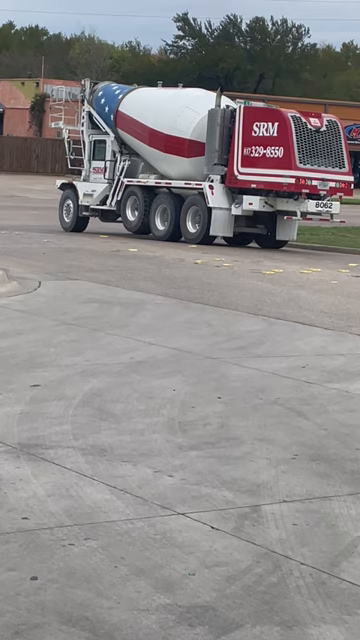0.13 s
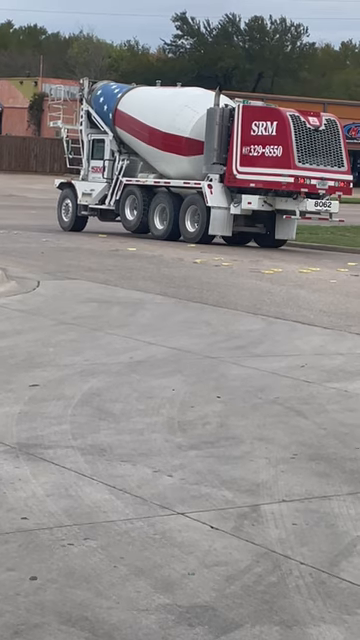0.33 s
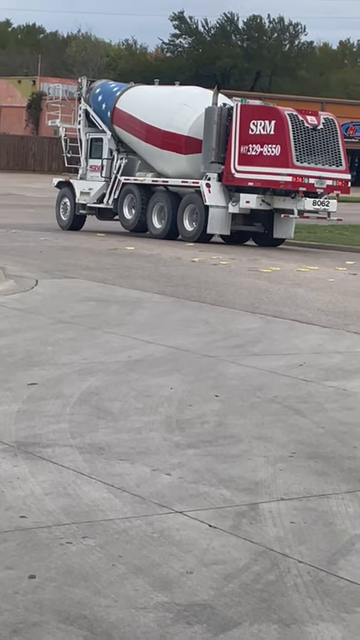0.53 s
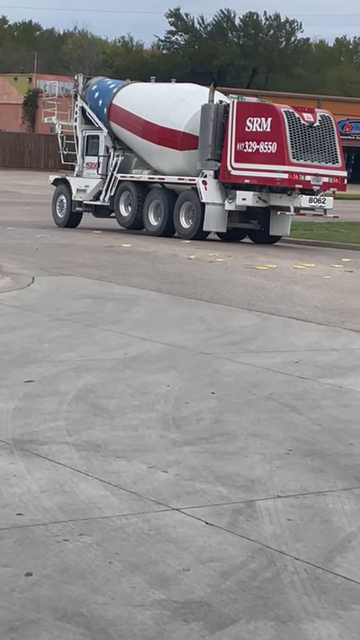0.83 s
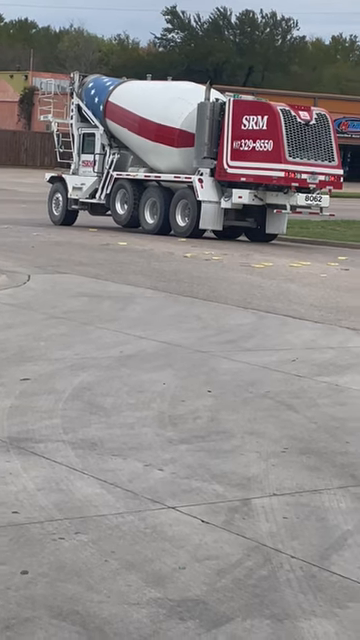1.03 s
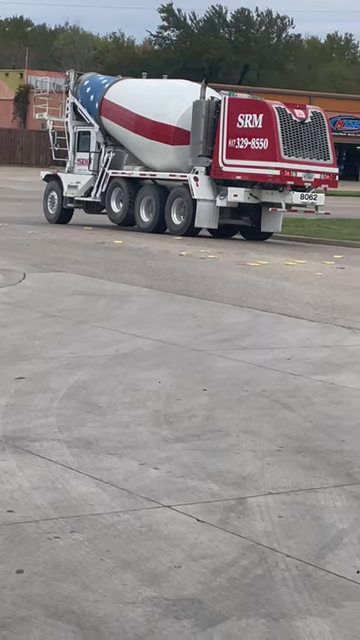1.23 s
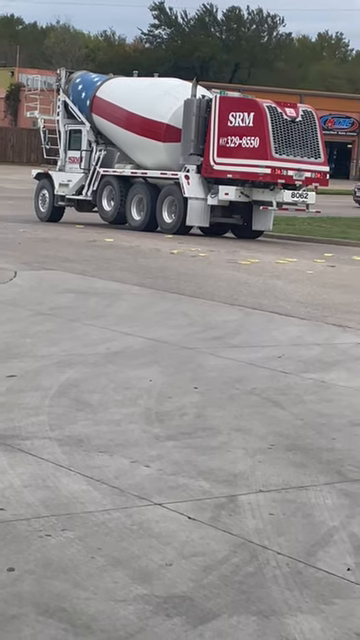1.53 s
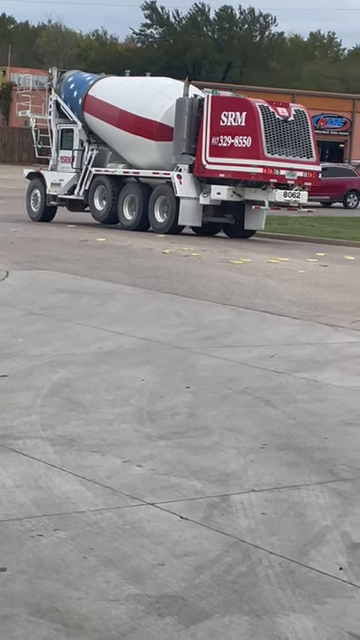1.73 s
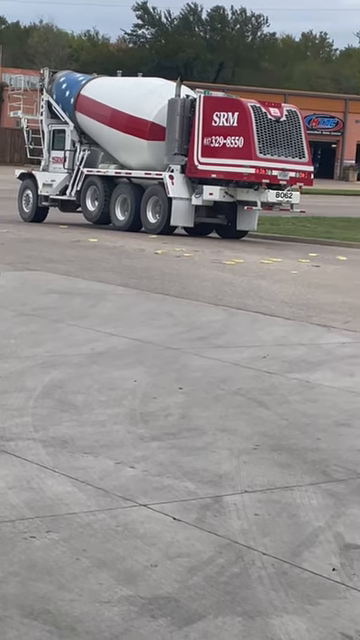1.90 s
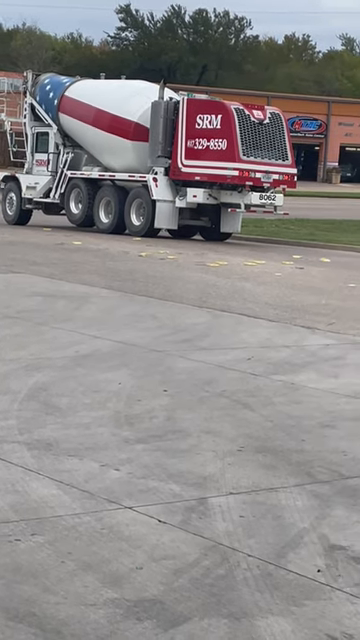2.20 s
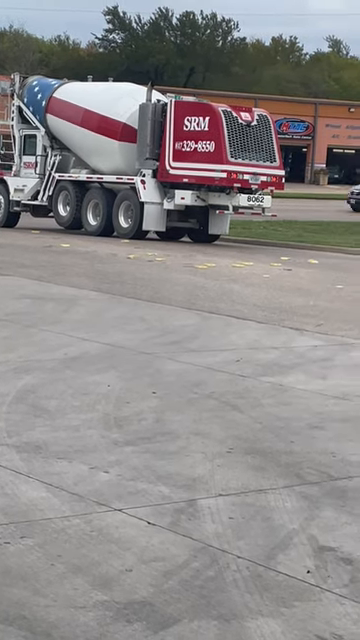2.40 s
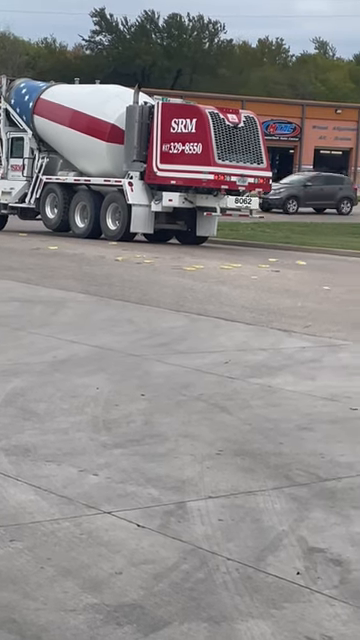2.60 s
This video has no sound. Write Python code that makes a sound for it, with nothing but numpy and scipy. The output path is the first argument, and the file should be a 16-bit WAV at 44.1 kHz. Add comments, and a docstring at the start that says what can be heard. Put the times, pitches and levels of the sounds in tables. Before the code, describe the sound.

A mixer truck's diesel engine rumbles near idle throughout, some way off, with a wavering hum from its drum. A thin brake squeal dies away within the first 0.4 seconds. Light metal rattles, clinks and a high ringing come and go, strongest from 2 to 2.5 seconds. Cars pass faintly around 1.2 and 2.6 seconds. Wind rumbles on the microphone, thumping near 0.5 and 1.6 seconds.

```python
"""A mixer truck creeps across a paved lot, some way off, its diesel engine near idle.
The drive that turns its drum hums and wavers. Each engine firing puffs out hiss and shakes loose metal,
one panel sings, and a brake squeal dies away at the start. Road noise and passing cars lie behind,
and wind buffets the two ports (sound openings) of a phone's microphones."""
import sys
import numpy as np
from scipy import signal
from scipy.fft import rfft, irfft
from scipy.io import wavfile
from scipy.ndimage import uniform_filter1d

SR = 44100
rng = np.random.default_rng(int(sys.argv[2]) if len(sys.argv) > 2 else 0)


def wav_record(signal):
    """Record a signal, one row per channel, as 16-bit PCM in the file named by sys.argv[1]."""
    frames = np.transpose(np.atleast_2d(signal))
    bounded = np.clip(frames, -1, 1)
    # unit amplitude maps onto the largest positive 16-bit level
    quanta = np.round(bounded * 32767).astype(np.int16)
    wavfile.write(sys.argv[1], SR, quanta)


N = 121275
TIME = np.arange(N) / SR

# How fast the drum drive cycles (time [s], rate [Hz])
DRIVE_RATE = [(0, 32.55), (.3, 32.6), (.55, 33.2), (.78, 33.39), (1.0, 33.3), (1.2, 32.79), (1.6, 32.62),
              (2.0, 32.83), (2.35, 33.6), (2.75, 32.87)]
# The tones of the hum (multiple of the drive rate, level [dB])
HUM_TONES = [(5, -44.5), (6, -46), (7, -33), (8, -40.5)]
# How the loudest tone swells and dips (time [s], level change [dB])
HUM_SWELLS = [(0, -2.5), (.08, 5), (.17, 2.5), (.21, -2), (.255, 6.5), (.33, 2), (.44, -3), (.68, -0.5),
              (.8, -2.5), (.95, -4), (1.1, 0), (1.25, -1.5), (1.45, 2), (1.56, -6.5), (1.7, -1),
              (1.9, -0.5), (2.1, -1.5), (2.28, 0), (2.5, 0), (2.66, -0.5), (2.72, 7), (2.75, -1)]


def drum_hum():
    """The drum drive hums at multiples of its wavering rate, with a soft boom of noise around them."""
    cycles = np.cumsum(curve(DRIVE_RATE)) / SR
    loudest_db = max(db for _, db in HUM_TONES)
    tones = np.zeros(N)
    for multiple, db in HUM_TONES:
        flutter_db = wobble(top_hz=3.8)
        swell_db = curve(HUM_SWELLS) if db == loudest_db else 0
        tones += amp(db + flutter_db + swell_db) * tone(multiple * cycles)
    boom = [unit(noise_band(white, hz=237, width_hz=64)) for white in rng.standard_normal((2, N))]
    return tones + amp(-44.5) * np.array(boom)


def engine_firings(rate_hz=35.4, anchor_s=2.357, jitter_s=0.0014, spread_db=3):
    """One click each time the diesel fires, a little uneven in timing and strength."""
    beats = np.arange(-90, 20)  # counted from the firing at anchor_s
    timing, strength = rng.standard_normal((len(beats), 2)).T
    at = np.round((anchor_s + beats / rate_hz + jitter_s * timing) * SR).astype(int)
    inside = (at >= 0) & (at < N)
    clicks = np.zeros(N)
    clicks[at[inside]] = amp(spread_db * strength[inside])
    return clicks


# Tone colour of the engine and road noise (frequency [Hz], level [dB])
ROAR_COLOUR = [(40, -40), (120, -4), (250, 0), (400, -1), (700, -2), (1080, -1), (1200, -5), (1500, -5),
               (2000, -11), (2600, -13), (3300, -13), (4000, -17), (4800, -23), (5600, -23), (6600, -25),
               (7600, -29), (8500, -31), (10000, -34), (11500, -39), (13000, -42), (16000, -41)]
# How loud that noise is (time [s], level [dB])
ROAR_LOUDNESS = [(0, -33), (.48, -32.5), (.8, -31.5), (1.15, -31.5), (1.5, -32.5), (1.95, -33.5),
                 (2.3, -32), (2.55, -31), (2.75, -32)]
# Pitches at which the truck's body rings (pitch [Hz], width [Hz], level [dB])
BODY_RESONANCES = [(382.7, 34, -47), (429.5, 30, -46), (573, 19, -47.5), (852, 12, -49.5),
                   (1058.5, 18, -51.5)]


def engine_and_road_roar(firings, puff_db=3.0, puff_s=0.0035):
    """Broad noise jumps at each firing and falls back, while the truck's body drones steadily."""
    puffs = signal.oaconvolve(firings > 0, np.exp(-TIME[:3000] / puff_s))[:N]
    pulsing = amp(puff_db * puffs + 0.5 * wobble(top_hz=16))
    white = rng.standard_normal((2, N))
    body = sum(amp(db) * unit(resonate(white, hz, width)) for hz, width, db in BODY_RESONANCES)
    roar = patchy_noise(ROAR_COLOUR, patch_db=0.92, bins=14, frames=10)
    return amp(curve(ROAR_LOUDNESS)) * unit(pulsing * roar) + body


# Pitches that colour the rattle: ringing notes and bright treble peaks (pitch [Hz])
RATTLE_PITCHES = [3030, 3270, 3415, 3563, 4110, 4330, 4540, 5450, 5940, 6870, 8270, 9660, 10200, 10800]
# How each of those pitches sounds (relative level [dB], time to fade by 60 dB [s])
RATTLE_FADES = [(0, .025), (1, .025), (0, .03), (3, .04), (4, .02), (-1, .04), (-5, .04), (-8, .02),
                (0, .04), (-6, .028), (-9, .025), (-12, .025), (-11, .025), (-15, .025)]
# How loud the rattle is (time [s], level [dB])
RATTLE_LOUDNESS = [(0, -53), (.45, -58), (.55, -51), (.7, -73), (1.08, -53), (1.12, -50), (1.2, -60),
                   (1.45, -55), (1.53, -47.5), (1.7, -53), (1.9, -48.5), (1.97, -47), (2.05, -52),
                   (2.18, -48.5), (2.24, -41.5), (2.3, -43), (2.37, -39), (2.45, -42), (2.53, -44.5),
                   (2.6, -66), (2.75, -57)]


def rattle(firings, strays_per_s=260, tick_s=0.005):
    """Firings and stray knocks shake loose metal; treble peaks and ticks of hiss brighten the rattle."""
    age, ringing = TIME[:5000], np.zeros(N)
    for hz, (db, fade_s) in zip(RATTLE_PITCHES, RATTLE_FADES):
        strays = amp(-6) * (rng.random(N) < strays_per_s / SR)
        hits = (firings + strays) * rng.uniform(0.4, 1, N) * rng.choice([-1, 1], N)
        one_ring = amp(db - 60 * age / fade_s) * np.sin(2 * np.pi * hz * age)
        ringing += signal.oaconvolve(hits, one_ring)[:N]
    hiss = resonate(rng.standard_normal(N), hz=6000, width_hz=6000)
    ticks = signal.oaconvolve(firings, np.exp(-age / tick_s))[:N] * hiss
    return amp(curve(RATTLE_LOUDNESS)) * (unit(ringing) + amp(-16) * unit(ticks))


# Single clinks of loose metal (time [s], level [dB], pitch [Hz])
METAL_CLINKS = [(.9, -39, 3520), (1.155, -39, 3480), (1.962, -36, 3490), (2.13, -40, 4000),
                (2.243, -42, 4330), (2.3, -37, 3700), (2.303, -36, 3450), (2.357, -38, 4110),
                (2.383, -33, 4160), (2.19, -45, 5940), (2.22, -44, 5940), (2.357, -42, 5940),
                (2.357, -36, 3560), (2.705, -39, 3565), (.815, -40, 3540), (1.01, -41, 3500),
                (2.47, -45, 5960), (2.503, -43, 5940)]


def metal_clinks(fade_s=0.045):
    """Struck metal gives a short tone that drops 60 dB in fade_s."""
    out = np.zeros(N)
    for start, db, hz in METAL_CLINKS:
        age = TIME - start
        out += (age > 0) * amp(db - 60 * abs(age) / fade_s) * np.sin(2 * np.pi * hz * age)
    return out


# Single ticks from the truck's frame (time [s], level [dB], middle frequency [Hz])
FRAME_TICKS = [(1.104, -31.5, 4800), (1.964, -33, 4800), (2.33, -46, 9400), (2.357, -38, 9300),
               (2.385, -41, 9450), (2.415, -41, 10000), (2.443, -35.5, 10100)]


def frame_ticks(decay_s=0.005, width_hz=3300):
    """The frame gives dry ticks: bursts of bright noise that die at once."""
    white, out = rng.standard_normal(N), np.zeros(N)
    for start, db, hz in FRAME_TICKS:
        age = TIME - start
        out += amp(db) * (age > 0) * np.exp(-abs(age) / decay_s) * noise_band(white, hz, width_hz)
    return out


# The note of the singing panel (time [s], pitch [Hz])
PANEL_PITCH = [(0, 3600), (.85, 3605), (1.16, 3585), (1.4, 3575), (1.55, 3560), (2.75, 3562)]
# How loud the panel is (time [s], level [dB])
PANEL_LOUDNESS = [(0, -51), (.3, -60), (.37, -52), (.45, -55), (.62, -64), (.7, -50), (.83, -49), (.9, -46),
                  (.95, -53), (1.0, -45), (1.08, -51), (1.16, -42), (1.24, -55), (1.35, -55), (1.42, -47.5),
                  (1.55, -40), (1.58, -56), (1.82, -57), (1.9, -48.5), (1.99, -43), (2.04, -55),
                  (2.15, -49.5), (2.25, -46), (2.35, -36.5), (2.42, -46), (2.5, -46), (2.6, -51),
                  (2.68, -46), (2.73, -48), (2.75, -50)]


def singing_panel(wander_hz=17, stutter_db=3.0):
    """One panel vibrates with a thin, fuzzy tone that sinks a little in pitch and stutters quickly."""
    pitch = curve(PANEL_PITCH) + wander_hz * wobble(top_hz=31)
    pure = np.exp(2j * np.pi * np.cumsum(pitch) / SR)
    fuzz = wobble(top_hz=75) + 1j * wobble(top_hz=75)
    fuzzy = (pure * (1 + 0.75 * fuzz)).real
    stutter = amp(stutter_db * wobble(top_hz=65))
    return amp(curve(PANEL_LOUDNESS)) * unit(stutter * fuzzy)


# The notes of the brake (pitch [Hz])
BRAKE_PITCHES = [8826, 9353, 8630]
# How each of those notes dies (level [dB], fade start [s], fade speed [dB/s])
BRAKE_FADES = [(-44.5, 0.17, 330), (-43, 0.082, 170), (-48, 0.11, 150)]


def brake_squeal(pure_share=0.7):
    """The brake squeals in thin high tones, part pure and part fuzzy, that soon fade."""
    out = np.zeros(N)
    for hz, (db, fade_start, db_per_s) in zip(BRAKE_PITCHES, BRAKE_FADES):
        level = amp(db - db_per_s * np.maximum(TIME - fade_start, 0))
        pure = tone(hz * TIME)
        fuzz = unit(noise_band(rng.standard_normal(N), hz, width_hz=60))
        out += level * (pure_share * pure + (1 - pure_share) * fuzz)
    return out


# Cars going by (loudest time [s], fade time [s], level [dB], middle frequency [Hz], width [Hz])
CAR_PASSES = [(1.225, 0.18, -41, 705, 220), (1.08, 0.28, -41, 1082, 78), (2.583, 0.27, -39.5, 1480, 950),
              (2.645, 0.28, -39.5, 1030, 180)]


def passing_cars():
    """Tyres roar on the road, swelling and fading as cars go by."""
    out = np.zeros((2, N))
    for peak_s, fade_s, db, hz, width in CAR_PASSES:
        swell = amp(db) * np.exp(-((TIME - peak_s) / fade_s) ** 2)
        out += swell * unit(noise_band(rng.standard_normal((2, N)), hz, width))
    return out


# Tone colour of the wind (frequency [Hz], level [dB])
WIND_COLOUR = [(20, -16), (35, -6), (52, 3), (70, 1), (100, -1), (150, -4), (250, -10), (400, -22),
               (800, -45), (3000, -100)]
# How loud the wind is (time [s], level [dB])
WIND_LOUDNESS = [(0, -21.5), (.1, -35), (.3, -30.5), (.42, -35), (.53, -29), (.66, -34.5), (.72, -40),
                 (.78, -36.5), (.95, -41.5), (1.14, -28.5), (1.26, -36), (1.39, -37), (1.43, -30.5),
                 (1.47, -43), (1.56, -26), (1.62, -35), (1.82, -42), (1.92, -31), (2.1, -28), (2.2, -31.5),
                 (2.3, -29), (2.36, -35.5), (2.47, -32.5), (2.56, -35.5), (2.7, -26.5), (2.75, -29.5)]


def wind_rumble():
    """Air swirling at the ports makes a low, lumpy rumble."""
    return amp(curve(WIND_LOUDNESS)) * patchy_noise(WIND_COLOUR, patch_db=1.6, bins=2, frames=5)


# Single thumps of wind (time [s], level [dB], pitch [Hz], length [s])
WIND_THUMPS = [(0.082, -22.5, 78, 0.035), (.542, -14.5, 167, 0.0092), (.535, -24.5, 278, 0.025),
               (.57, -24.5, 198.4, 0.034), (1.566, -15.5, 113, 0.023), (1.564, -17.5, 272, 0.023),
               (1.572, -21, 390, 0.0071), (1.557, -28, 590, .008), (2.5, -20.5, 61, 0.034)]


def wind_thumps():
    """Wind hits the ports in short, low pulses."""
    out = np.zeros(N)
    for peak_s, db, hz, length in WIND_THUMPS:
        offset = TIME - peak_s
        out += amp(db) * np.exp(-(2 * offset / length) ** 2) * np.cos(2 * np.pi * hz * offset)
    return out


# Tone colour of the gusts (frequency [Hz], level [dB])
GUST_COLOUR = [(40, -30), (90, -11), (170, 0), (300, -6.5), (600, -20), (1200, -41), (4000, -100)]
# How loud the gusts are (time [s], level [dB])
GUST_LOUDNESS = [(0, -40), (.08, -53), (.13, -63), (.35, -65), (.41, -35), (.5, -27), (.58, -40), (.8, -43),
                 (.9, -70), (1.1, -56), (1.45, -49), (2.25, -54), (2.35, -74), (2.6, -62), (2.68, -44),
                 (2.75, -54)]


def wind_gusts():
    """Swirling air pushes on one port while it pulls on the other."""
    swirl = unit(patchy_noise(GUST_COLOUR, patch_db=1.6, bins=2, frames=5)[0])
    return [[1], [-1]] * amp(curve(GUST_LOUDNESS)) * swirl


# How alike the two ports sound (frequency [Hz], likeness [1 = fully alike])
PORT_LIKENESS = [(30, .9993), (60, .999), (140, 1), (300, 0.99), (460, 0.98), (800, 0.99), (1200, 1),
                 (1900, .999), (2300, 0.99), (3500, 0.86), (5000, .99), (6200, 0.72), (7500, 1),
                 (9000, 0.92), (11000, 0.26), (12500, 1), (14000, 0.95)]
# How far the left port's wave runs ahead of the right's (frequency [Hz], phase [radians])
LEFT_LEAD = [(0, 0), (1980, 0), (10400, 6.28), (11700, 6.28), (2580, .9), (3790, .5), (4480, .9),
             (4740, .1), (5250, -.1), (6290, 1.8), (6980, 3.1), (8180, 3.2), (9390, 4.8), (12600, 7.8),
             (13200, 9.3), (15300, 9.5)]
# How much louder the left port is than the right (frequency [Hz], level [dB])
LEFT_BALANCE = [(60, 0), (190, 0), (260, -.6), (460, -2), (820, -.5), (1300, 0), (16000, 0)]


def microphone_ports(pair):
    """Both ports hear the first signal, a little out of step; the second signal sets them apart."""
    common, other = rfft(pair)
    hz = np.fft.rfftfreq(N, 1 / SR)
    likeness = np.clip(at_frequency(PORT_LIKENESS, hz), -1, 1)
    middle = np.sqrt((1 + likeness) / 2) * common
    side = np.sqrt((1 - likeness) / 2) * other
    lead = np.interp(hz, *np.transpose(sorted(LEFT_LEAD)))
    shift = np.exp(0.5j * lead) * amp(at_frequency(LEFT_BALANCE, hz) / 2)  # half for each port
    return irfft(np.array([(middle + side) * shift, (middle - side) / shift]), N)


def amp(db):
    """Turn decibels into a volume multiplier."""
    return 10 ** (np.asarray(db) / 20)


def unit(x):
    """Scale a signal to an average strength (RMS) of 1."""
    return x / np.sqrt(np.mean(x ** 2) + 1e-20)


def at_frequency(points, hz):
    """Look up values between the rows of a frequency table."""
    frequencies, values = np.transpose(points)
    return np.interp(np.log(hz + 1), np.log(frequencies + 1), values)


def curve(points):
    """Join the rows of a time table with straight lines."""
    return np.interp(TIME, *np.transpose(points))


def tone(cycles):
    """A pure tone of strength 1 that starts anywhere in its cycle."""
    return np.sqrt(2) * np.sin(2 * np.pi * (cycles + rng.random()))


def wobble(top_hz):
    """A random drift of strength 1, with little movement faster than top_hz."""
    spectrum = rfft(rng.standard_normal(N))
    return unit(irfft(spectrum * np.exp(-(np.fft.rfftfreq(N, 1 / SR) / top_hz) ** 2), N))


def patchy_noise(colour, patch_db, bins, frames):
    """Two noises with the same loud and soft patches, bins wide in pitch and frames long in time."""
    count, hz = N // 256 + 5, np.fft.rfftfreq(1024, 1 / SR)
    real_a, imag_a, real_b, imag_b, patches = rng.standard_normal((count, 513, 5)).T
    patches = unit(uniform_filter1d(uniform_filter1d(patches, bins, 0), frames, 1))
    gain = amp(at_frequency(colour, hz)[:, None] + patch_db * patches)
    spectra = np.array([real_a + 1j * imag_a, real_b + 1j * imag_b]) * gain
    return unit(signal.istft(spectra, nperseg=1024, noverlap=768)[1][:, :N])


def resonate(x, hz, width_hz):
    """Favour the part of a sound near one pitch."""
    decay = np.exp(-np.pi * width_hz / SR)
    return 2 * signal.lfilter([1 - decay], [1, -decay * np.exp(2j * np.pi * hz / SR)], x).real


def noise_band(white, hz, width_hz):
    """Resonate noise twice for a band with steeper edges."""
    return resonate(resonate(white, hz, width_hz), hz, width_hz)


def scene():
    """The truck, the road and the wind, as the two ports hear them."""
    firings = engine_firings()
    wide = drum_hum() + engine_and_road_roar(firings) + passing_cars() + wind_rumble()
    shared = (wind_thumps() + rattle(firings) + singing_panel()
              + frame_ticks() + metal_clinks() + brake_squeal())
    return microphone_ports([wide[0] + shared, wide[1]]) + wind_gusts()


def record(dry, low_cut_hz=43, high_cut_hz=15800):
    """The microphone loses the deepest bass and the highest treble."""
    bass_cut = signal.butter(3, low_cut_hz, "high", fs=SR, output="sos")
    treble_cut = signal.firwin(511, high_cut_hz, window=("kaiser", 9), fs=SR)
    return signal.oaconvolve(signal.sosfilt(bass_cut, dry), treble_cut[None], "same")


dry = scene()
out = record(dry)
wav_record(out)
```